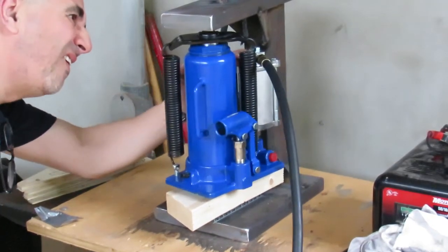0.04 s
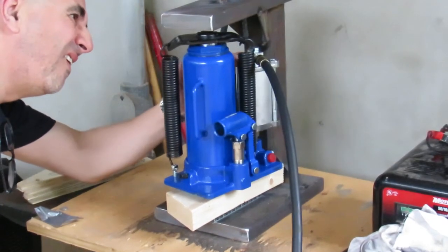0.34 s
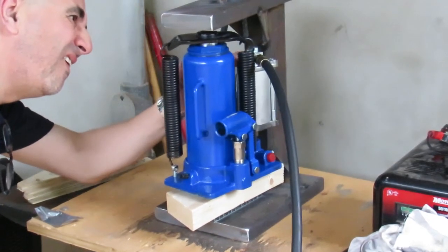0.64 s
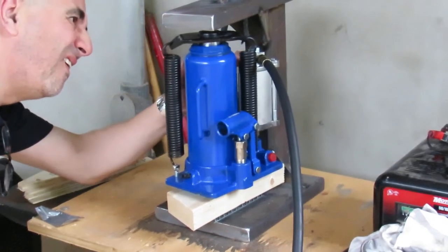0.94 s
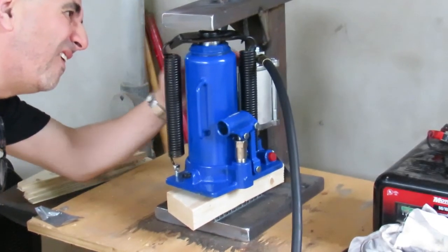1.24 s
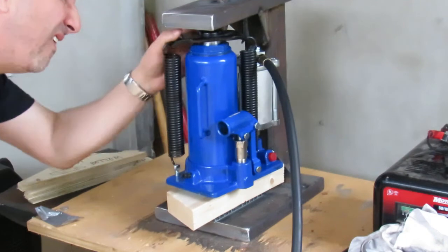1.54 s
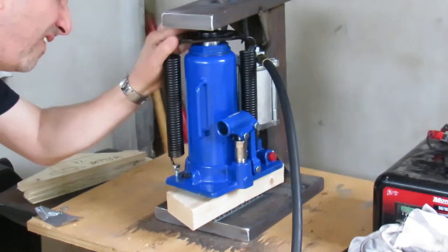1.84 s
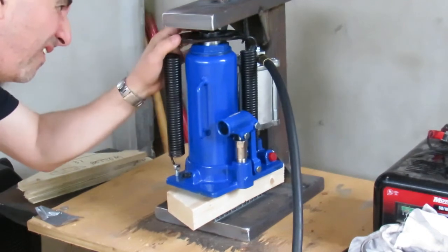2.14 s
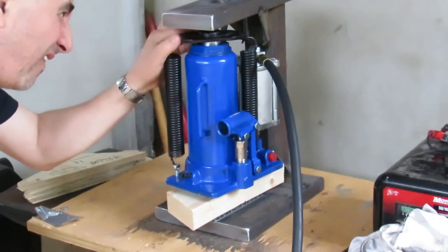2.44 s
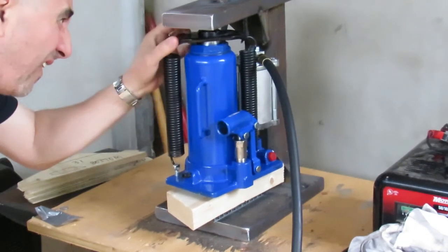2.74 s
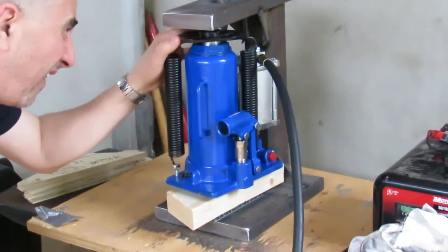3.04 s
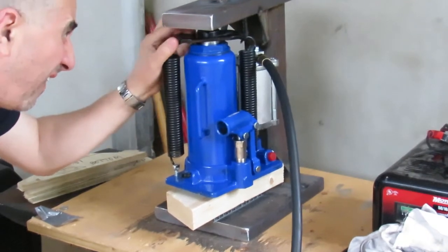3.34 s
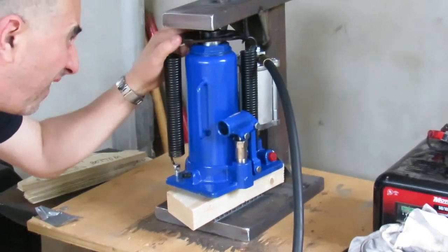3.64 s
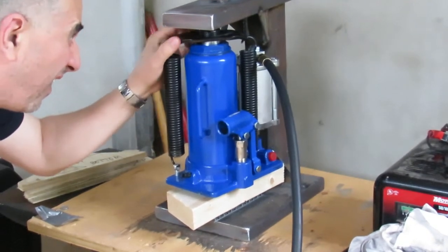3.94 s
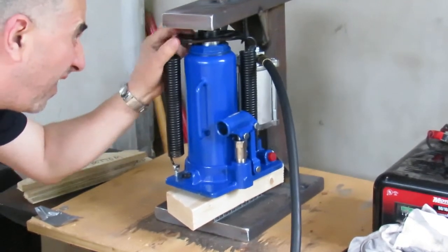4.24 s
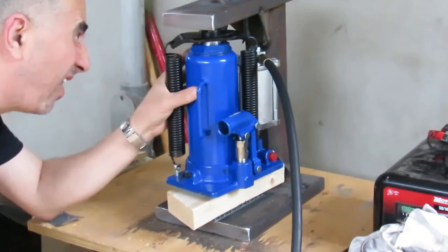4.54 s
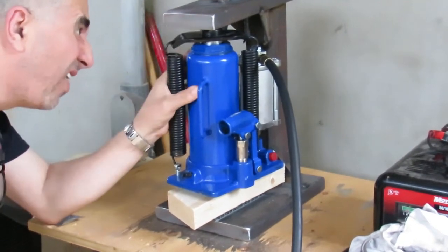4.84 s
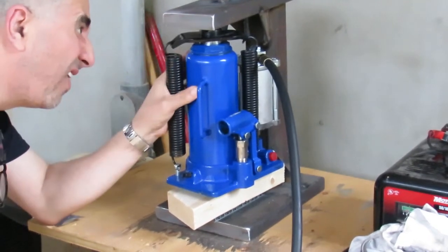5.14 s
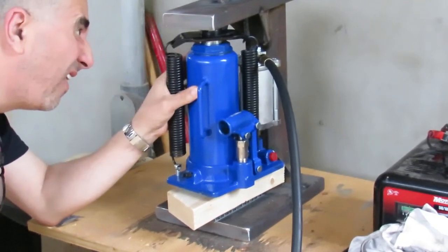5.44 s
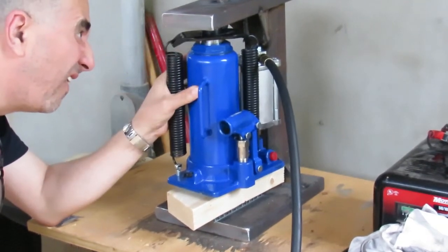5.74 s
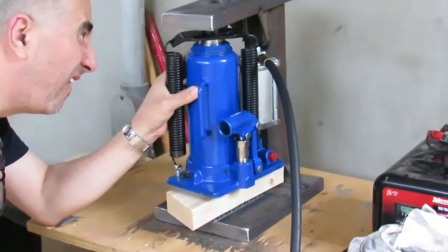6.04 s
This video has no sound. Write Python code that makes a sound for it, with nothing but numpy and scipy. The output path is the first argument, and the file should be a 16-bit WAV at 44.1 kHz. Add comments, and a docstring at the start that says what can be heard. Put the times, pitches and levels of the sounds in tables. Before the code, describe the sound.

In a small workshop, air hisses into a bottle jack and it pumps in a short, loud burst of rapid puffs and metallic knocks. It stops, and for about four seconds its steel top and springs tick quietly while a hand scuffs them. Then a brief whistling hiss starts a second, slightly faster burst. The room echoes briefly, and low buffeting lies on the microphone.

```python
"""Two bursts of rapid puffs and knocks: an air-driven bottle jack pumps under a steel press frame.
Air hisses in, then each stroke of the air motor vents a puff and the piston knocks on the pump body.
Between the bursts the jack's steel top and return springs tick and a hand scuffs them.
A little air seeps with a thin whistle that fades out. The small workshop reverberates briefly;
low buffeting lies on the microphone."""
import sys
import numpy as np
from scipy import signal
from scipy.fft import rfft, irfft, next_fast_len
from scipy.io import wavfile
from scipy.ndimage import uniform_filter1d

SR = 44100
rng = np.random.default_rng(int(sys.argv[2]) if len(sys.argv) > 2 else 0)


def int16_out(signal):
    """Quantize to a 16-bit WAV file."""
    q = np.round(np.clip(np.atleast_2d(signal).T, -1, 1) * 32767)
    wavfile.write(sys.argv[1], SR, q.astype(np.int16))


N = 272979
TIME = np.arange(N) / SR
VALVE_CLOSE_S = 0.0064

# piston strokes: t/s, knock gain/dB, exhaust gain/dB
STROKES = [(0.5917, 4.5, 1.5), (0.6847, 2, 1.5), (0.7773, 4, -0.5), (0.87, 3.5, -0.5), (0.964, 2.5, 0),
           (1.0587, 3, -1), (1.1504, 4, -5.5), (5.4618, 3.5, 4.5), (5.54, 3, 3), (5.6219, 3.5, 3.5),
           (5.7006, 3.5, 2.5), (5.7834, 2, 3), (5.865, 2.5, 2), (5.95, 1, 1.5), (6.0312, 1.5, 1.5),
           (6.1143, 2.5, -1.5), (6.1970, -1, -6)]
# valve presses: open/s, rise/s, piston start/s, close/s, throttle/0-1, hiss/dB, whistle/dB
PRESSES = [(.495, 0.057, 0.56, 1.145, 0, -39.5, -51), (5.336, 0.027, 5.432, 6.25, 0.89, -44, -40.5)]
# friction on steel: f/Hz, density/dB
FRICTION_COLOUR = [(250, -7.5), (450, 1.5), (1000, 1), (2200, -1), (4000, -8), (7000, -19.5), (15000, -54)]
# stereo width of jack and room: f/Hz, side-mid/dB
JACK_SIDE = [(100, -44), (300, -45), (550, -40), (1400, -82), (1900, -25), (2500, -14.5), (5600, -8),
             (10000, -4), (14000, 4)]
# stereo width of rumble and buffeting: f/Hz, side-mid/dB
RUMBLE_SIDE = [(35, -34), (85, -25.5), (170, -13), (320, -5), (600, -6)]


def from_db(db):
    """Decibels to gain."""
    return 10 ** (np.asarray(db) / 20)


def rms_one(x):
    """Scale to unit rms."""
    return x / np.sqrt(np.mean(x ** 2) + 1e-20)


def at_hz(points, hz):
    """Read a table on a log-frequency axis."""
    f, value = np.transpose(points)
    return np.interp(np.log(np.maximum(hz, 1)), np.log(f), value)


def add(out, at_s, sound):
    """Mix a sound in at a time."""
    i = int(np.clip(round(at_s * SR), 0, N))
    out[:, i:i + sound.shape[-1]] += sound[..., :N - i]


def envelope(t, start_s, rise_s, end_s, fall_s):
    """Linear attack, hold, exponential release."""
    return np.clip((t - start_s) / rise_s, 0, 1) * np.exp(-np.maximum(t - end_s, 0) / fall_s)


def noise(colour, size, side=None, peaks=(), tilt_db_per_oct=0):
    """Unit-rms stereo noise with resonances and tilt; falls 24 dB/octave beyond its colour table."""
    default_side = [(100, -38), (350, -12), (700, -14), (1400, -11.5), (2500, -7.5), (5000, -6),
                    (8000, -5.5), (14000, -14)]  # f/Hz, side-mid/dB
    padded = next_fast_len(size)
    hz = np.maximum(np.fft.rfftfreq(padded, 1 / SR), 1)
    db = at_hz(colour, hz) + tilt_db_per_oct * np.log2(hz)
    db -= 24 * (np.maximum(np.log2(hz / colour[-1][0]), 0) + np.maximum(np.log2(colour[0][0] / hz), 0))
    for centre_hz, width_hz, peak_db in peaks:
        db += peak_db / (1 + (2 * (hz - centre_hz) / width_hz) ** 2)
    mid, apart = rfft(rng.standard_normal((2, padded))) * from_db(db)
    apart *= from_db(at_hz(default_side if side is None else side, hz))
    return rms_one(irfft([mid + apart, mid - apart], padded)[:, :size])


def ring(modes, t):
    """Struck modes (f/Hz, level/dB, t60/s), alternating in sign."""
    return sum((-1) ** k * from_db(db - 60 * t / t60_s) * np.sin(2 * np.pi * hz * t)
               for k, (hz, db, t60_s) in enumerate(modes))


def ambience(start_db=-47.5, sag_db_per_s=0.68, deep_db=-53):
    """Slowly sinking workshop noise over a steady deep rumble."""
    workshop_colour = [(180, -1.5), (300, -6.5), (543, -7), (663, -7.5), (756, -6.5), (835, -6.5),
                       (1350, -9.5), (1870, -14.5), (2040, -16), (3280, -19.5), (9290, -33.5), (15500, -44)]  # f/Hz, density/dB
    deep_colour = [(22, -18), (42, -5), (60, -1)]  # f/Hz, density/dB
    room_tone = from_db(start_db - sag_db_per_s * TIME) * noise(workshop_colour, N)
    return room_tone + from_db(deep_db) * noise(deep_colour, N, RUMBLE_SIDE)


def lumps(depth_db=4.0, lump_s=0.031):
    """Irregular gain with small swells and deeper dips."""
    size = int(lump_s * SR)
    sway = rms_one(uniform_filter1d(uniform_filter1d(rng.standard_normal(N), size), size))
    return rms_one(from_db(depth_db * np.clip(sway, -2, 0.99)))


def buffeting(rumble_db=-1.5, gust_db=-11, gust_power=3.35, strong_db=-28, bump_s=0.003, even_s=0.0478):
    """Lumpy low pressure on the microphone, brighter when strong, with bumps of a cycle or two."""
    contour = [(0, -31.5), (.2, -29.5), (.33, -33.5), (1.1, -35), (1.19, -30), (1.65, -31), (1.9, -35),
               (2.9, -36), (3.13, -28), (3.22, -39), (3.48, -27.5), (4.1, -33), (4.33, -31.5), (4.72, -50),
               (4.97, -40.5), (5.3, -61.5), (5.48, -32.5), (6.19, -36.5)]  # t/s, level/dB
    rumble_colour = [(30, -15), (45, -9.5), (68, 1), (107, 2), (170, -5.5), (250, -16), (400, -31.5),
                     (600, -49)]  # f/Hz, density/dB
    gust_colour = [(110, -30), (170, 0), (250, -1), (350, -10.5), (600, -27)]  # f/Hz, density/dB
    bumps = [(0.068, -20, 131), (0.149, -23, 130), (0.229, -18.5, 171), (1.173, -20, 114), (1.2, -22, 145),
             (1.323, -15.5, 114), (1.449, -23, 193), (1.487, -22.5, 157), (1.71, -15.5, 93),
             (1.804, -21.5, 90), (1.919, -23, 70), (2.181, -20.5, 102), (2.305, -21.5, 141),
             (2.616, -17.5, 100), (2.977, -29, 129), (3.146, -19.5, 130), (3.458, -16, 140),
             (3.59, -17, 150), (3.892, -14.5, 129), (3.952, -13, 119), (3.991, -19.5, 187),
             (4.2, -23.5, 115), (5.603, -14.5, 146)]  # t/s, envelope peak/dB, f/Hz
    strength = from_db(np.interp(TIME, *np.transpose(contour)))
    rumble = noise(rumble_colour, N, RUMBLE_SIDE)
    rumble /= np.sqrt(uniform_filter1d(np.mean(rumble ** 2, axis=0), int(even_s * SR)))  # even out
    gust_gain = from_db(strong_db + gust_db) * np.minimum(strength / from_db(strong_db), 1) ** gust_power
    gusts = gust_gain * noise(gust_colour, N, RUMBLE_SIDE)
    out = (from_db(rumble_db) * strength * rumble + gusts) * lumps()
    t = np.arange(SR // 12) / SR
    pulse = t / bump_s * np.exp(1 - t / bump_s)
    for at_s, db, hz in bumps:
        add(out, at_s, from_db(db) * pulse * np.sin(2 * np.pi * hz * t))
    return out


def seep(level_db=-77, fade_start_s=2.3, fade_end_s=3.1):
    """Air escapes the line in a thin whistle that dies away between the bursts."""
    colour = [(7500, 0), (10500, -4)]  # f/Hz, density/dB
    whistles = [(7800, 300, 9), (9100, 260, 19), (10330, 160, 9)]  # f/Hz, width/Hz, boost/dB
    fade = np.interp(TIME, [fade_start_s, fade_end_s], [1, 0])
    return from_db(level_db) * fade * noise(colour, N, peaks=whistles)


def scuffs(grain_db=4, rise_s=.002):
    """Short grainy rubs of the hand on the jack."""
    rubs = [(1.804, -48.5, 0.073, -1), (2.943, -50, 0.035, 2.5), (3.047, -51.5, .04, 5),
            (3.319, -51, 0.017, 2), (3.563, -50, 0.027, 3.5), (3.872, -40.5, 0.021, -5.5),
            (3.963, -47.5, 0.014, 5), (4.647, -37.5, 0.036, -1), (4.678, -51, 0.046, -4),
            (4.967, -41.5, 0.026, 1.5)]  # t/s, level/dB, decay/s, tilt/(dB/octave)
    out, t = np.zeros((2, N)), np.arange(SR // 4) / SR
    for at_s, db, decay_s, tilt in rubs:
        roughness = rms_one(uniform_filter1d(rng.standard_normal(len(t)), size=90))
        grains = rms_one(from_db(grain_db * roughness))
        friction = noise(FRICTION_COLOUR, len(t), tilt_db_per_oct=tilt)
        add(out, at_s, from_db(db) * grains * envelope(t, 0, rise_s, rise_s, decay_s) * friction)
    return out


def ticks(knock_db=-43, ring_db=-48, snap_db=-44, snap_s=0.0079, slip_s=.007, slip_db=-4):
    """Steel top and springs slip in two quick steps, each a snap, a short knock and a long thin ring."""
    slips = [(1.404, -5, -2), (1.8383, -6, -2.5), (2.114, -8.5, -5), (2.3529, -5.5, -4.5),
             (2.638, -0.5, -2.5), (2.9159, -1.5, 1), (3.1144, -1.5, 2.5), (3.338, -1.5, 0),
             (3.706, -4, -1.5), (3.983, -5.5, 1.5), (4.258, -17.5, 6), (4.6982, -3.5, -2.5),
             (5.0807, -4.5, -2), (5.359, 3, -6), (5.4228, 6.5, -16)]  # t/s, gain/dB, extra ring gain/dB
    knock_modes = [(1204, -1.5, 0.1), (1545, -3.5, 0.16), (2247, -2, 0.068), (2650, 0.5, 0.041),
                   (2827, 4.5, 0.031)]  # f/Hz, level/dB, t60/s
    ring_modes = [(2774, -5, .3), (3263, -6, .2), (3405, 0, .33), (3513, -11, .2), (4125, -12, .38),
                  (4875, -14, .45)]  # f/Hz, level/dB, t60/s
    out, t = np.zeros((2, N)), np.arange(SR // 2) / SR
    knock = from_db(knock_db) * ring(knock_modes, t)
    for at_s, db, extra_db in slips:
        snap = from_db(snap_db) * noise(FRICTION_COLOUR, len(t), tilt_db_per_oct=-6) * np.exp(-t / snap_s)
        tick = from_db(db) * (snap + knock + from_db(ring_db + extra_db) * ring(ring_modes, t))
        add(out, at_s, tick)
        add(out, at_s + slip_s * rng.uniform(.5, 1.5), from_db(slip_db) * tick)
    return out


def throttle_at(t):
    """Supply builds to the press's throttle once the piston moves and collapses as the valve closes."""
    return sum(throttle * envelope(t, start_s, rise_s=.09, end_s=close_s, fall_s=VALVE_CLOSE_S)
               for _, _, start_s, close_s, throttle, _, _ in PRESSES)


def feed(throttle_leak_db=10.5, whistle_fade_s=0.013):
    """Air hisses through the motor while the valve is held and whistles until the piston moves."""
    colour = [(400, -6), (1300, -2), (2800, -2.5), (5000, -1), (7000, -4.5), (10000, -12.5), (15000, -22)]  # f/Hz, density/dB
    passages = [(2830, 120, 6), (4830, 150, 14), (5600, 160, 3), (6780, 250, 9)]  # air passage resonances: f/Hz, width/Hz, boost/dB
    flow = whistle = 0
    for open_s, rise_s, start_s, close_s, _, hiss_db, whistle_db in PRESSES:
        flow += from_db(hiss_db) * envelope(TIME, open_s, rise_s, close_s, VALVE_CLOSE_S)
        whistle += from_db(whistle_db) * envelope(TIME, open_s, rise_s, start_s, whistle_fade_s)
    flow *= from_db(throttle_leak_db * throttle_at(TIME))
    return flow * noise(colour, N, JACK_SIDE) + whistle * noise(colour, N, JACK_SIDE, peaks=passages)


def exhaust(puff_db=-22, lead_s=.0125, rise_s=0.0052, hold_s=0.0068, throttle_hold_s=0.0027):
    """The port opens just before the piston lands and rings as the cylinder empties."""
    colour = [(280, -3), (480, -7), (700, -5.5), (1000, -7), (1400, -3.5), (2000, -1), (2700, 0.5),
              (4000, -3.5), (5400, -4), (6200, -9.5), (7500, -7.5), (10000, -9.5), (13000, -19),
              (16000, -31)]  # f/Hz, density/dB
    port = [(2600, 160, 1.5), (5460, 270, 5.5), (7000, 83, 10)]  # resonances: f/Hz, width/Hz, boost/dB
    out, t = np.zeros((2, N)), np.arange(SR // 8) / SR
    for at_s, _, db in STROKES:
        end_s = lead_s + hold_s + throttle_hold_s * throttle_at(at_s)
        flow = envelope(t, 0, rise_s, end_s, fall_s=0.021)
        add(out, at_s - lead_s, from_db(puff_db + db) * flow * noise(colour, len(t), JACK_SIDE, port))
    return out


def knocks(body_db=-15.0, crack_db=-14.5, scatter_db=2.0, detune=0.0044, fresh_gain=2.8):
    """The piston hits its stop: a crack, partly the same each time, and the ring of the pump body."""
    body_modes = [(500, .05, -18, -19), (880, .03, -24, -19), (1250, .02, -7, -10), (1325, .026, -4, -10),
                  (1420, .022, -9, -7), (1760, .015, -15, -11), (2610, .04, -4, -3), (2150, .05, -12, -16),
                  (2262, .16, -9, -19), (2360, .06, -17, -19), (2670, .07, -14, -7), (2790, .14, -27, -10),
                  (2916, .07, -20, -11), (3172, .05, -18, -13), (3545, .12, -19, -19),
                  (3680, .09, -16, -18), (4160, .03, -16, -13), (4832, .08, -13, -15),
                  (5550, .06, -16, -16), (5658, .15, -25, -20), (6977, .12, -19, -21)]  # f/Hz, t60/s, low-throttle level/dB, full-throttle level/dB
    crack_colour = [(330, -4.5), (500, -9.5), (900, -20), (1300, 9.5), (1800, -8.5), (2700, -1.5),
                    (5500, -3.5), (8000, -11.5), (15000, -26.5)]  # f/Hz, density/dB
    out, t = np.zeros((2, N)), np.arange(SR // 4) / SR
    common = noise(crack_colour, len(t), JACK_SIDE)
    crack_shape = envelope(t, 0, rise_s=.001, end_s=0, fall_s=.007)
    body_attack = np.clip(t / .0012, 0, 1)
    for at_s, db, _ in STROKES:
        throttle = throttle_at(at_s)
        modes = []
        for hz, t60_s, low_db, full_db in body_modes:
            mode_hz = hz * (1 + detune * rng.normal())
            mode_db = low_db + throttle * (full_db - low_db) + scatter_db * rng.normal()
            modes.append((mode_hz, mode_db, t60_s))
        body = ring(modes, t) * body_attack
        crack = rms_one(common + fresh_gain * noise(crack_colour, len(t), JACK_SIDE)) * crack_shape
        add(out, at_s, from_db(db) * (from_db(body_db) * body + from_db(crack_db) * crack))
    return out


def workshop(x, tail_db=-5, early_db=-6, early_s=0.0075, predelay_s=0.00373):
    """Room return: dense early reflections from bench and wall, then a tail that dies band by band."""
    decay = [(200, 1), (700, 0.42), (1500, 0.53), (3000, 0.59), (5600, 0.5), (8000, 0.41), (14000, 0.31)]  # f/Hz, t60/s
    t = np.arange(int(.7 * SR)) / SR
    flat = [(100, 0), (20000, 0)]  # f/Hz, density/dB
    edges_hz = np.geomspace(120, 17000, 11)
    tail = 0
    for low_hz, high_hz in zip(edges_hz, edges_hz[1:]):
        bandpass = signal.butter(2, [low_hz, high_hz], "band", fs=SR, output="sos")
        band = signal.sosfilt(bandpass, noise(flat, len(t), JACK_SIDE))
        tail += band * from_db(-60 * t / at_hz(decay, np.sqrt(low_hz * high_hz)))
    late = rms_one(tail * np.clip((t - predelay_s) / early_s, 0, 1))
    early = rms_one(noise(flat, len(t), JACK_SIDE) * (t > predelay_s) * np.exp(-t / early_s))
    response = (from_db(tail_db) * late + from_db(early_db) * early) / np.sqrt(len(t))
    return signal.fftconvolve(x.mean(axis=0, keepdims=True), response, axes=1)[:, :N]


def off_centre(x):
    """Source slightly to the right: the left channel is weaker and about a third of a sample late."""
    return np.array([.95 * signal.lfilter([.5, 1], [1, .5], x[0]), x[1]])


def scene(knock_send_db=-5, tick_send_db=-4):
    """The air fills the room; the steel faces the microphone and sounds drier."""
    air, piston, steel, hand = exhaust() + feed(), knocks(), ticks(), scuffs()
    room = workshop(air + from_db(knock_send_db) * piston + from_db(tick_send_db) * steel + hand)
    return ambience() + seep() + buffeting() + hand + steel + off_centre(air + piston + room)


def record(dry, ceiling=1.2, cutoff_hz=15300):
    """Soft peak rounding, then a steep low-pass."""
    rounded = ceiling * np.tanh(dry / ceiling)
    return signal.sosfilt(signal.ellip(10, .2, 80, cutoff_hz, fs=SR, output="sos"), rounded)


dry = scene()
out = record(dry)
int16_out(out)
```